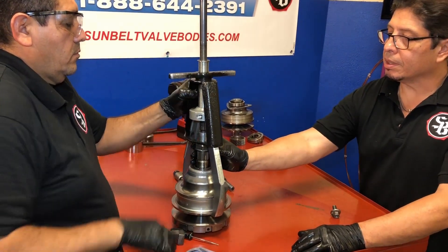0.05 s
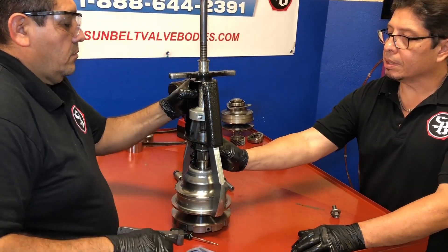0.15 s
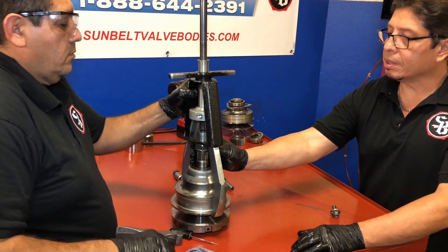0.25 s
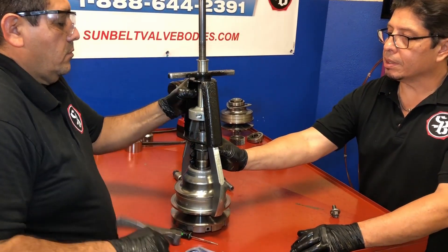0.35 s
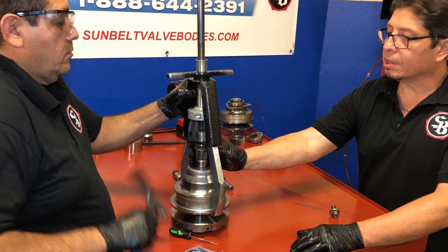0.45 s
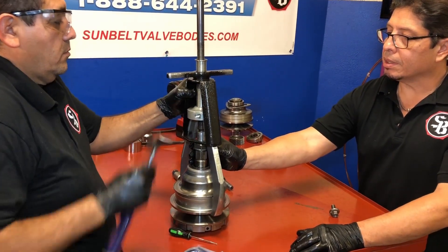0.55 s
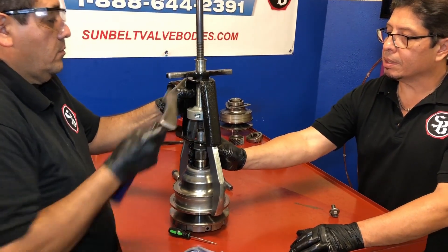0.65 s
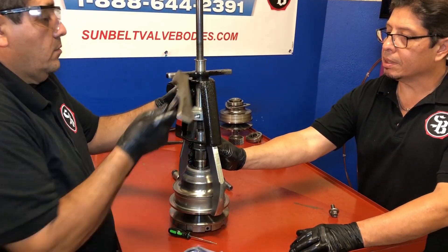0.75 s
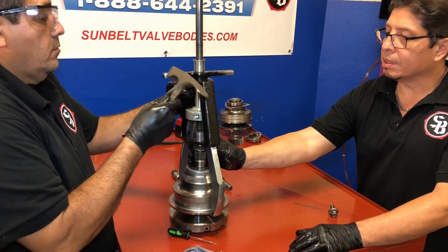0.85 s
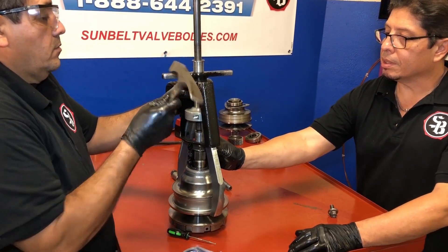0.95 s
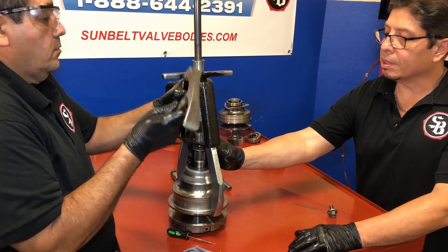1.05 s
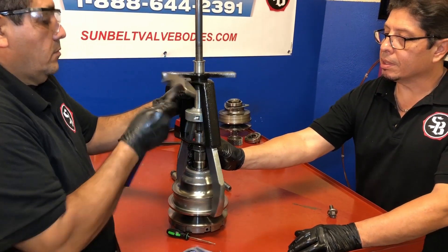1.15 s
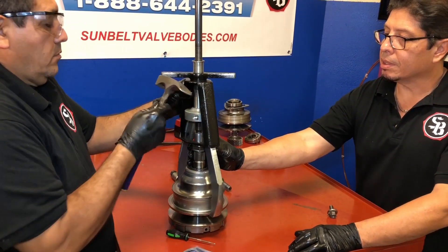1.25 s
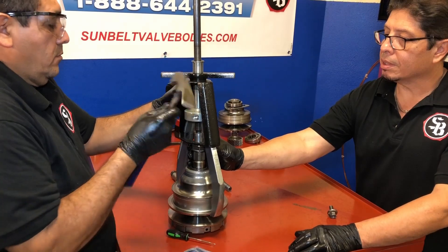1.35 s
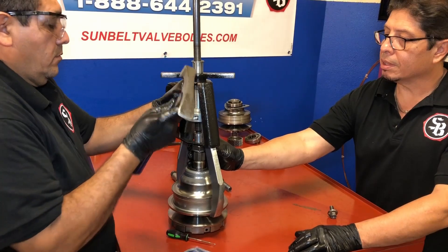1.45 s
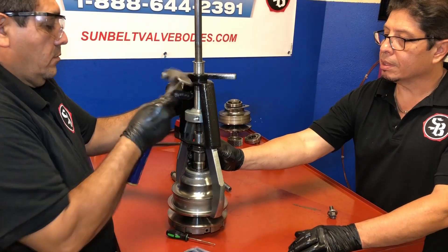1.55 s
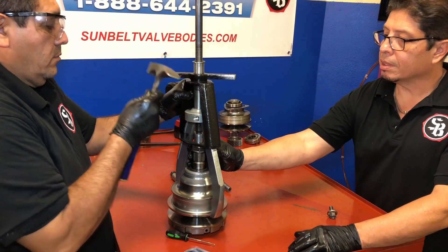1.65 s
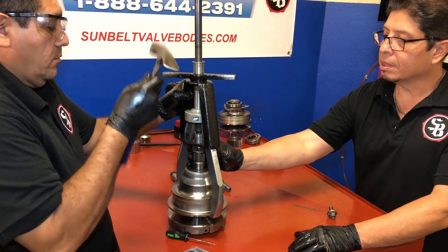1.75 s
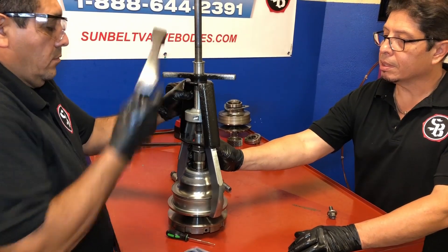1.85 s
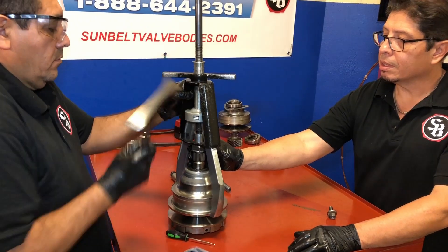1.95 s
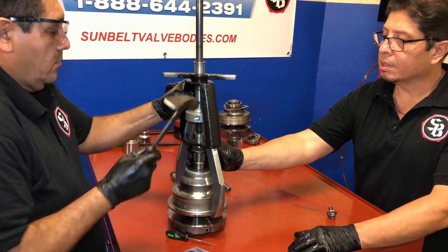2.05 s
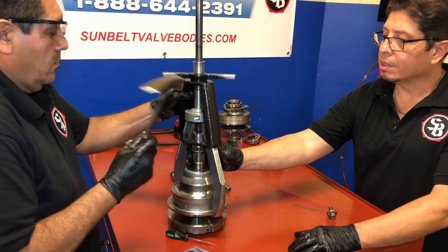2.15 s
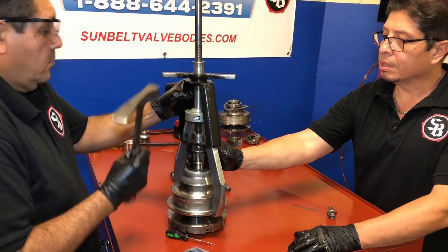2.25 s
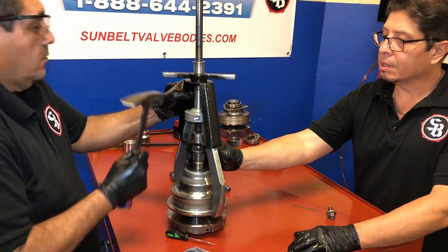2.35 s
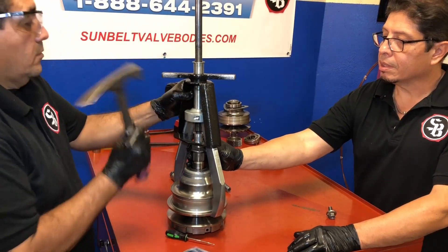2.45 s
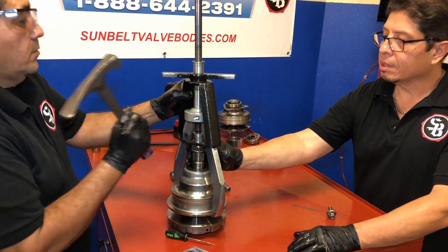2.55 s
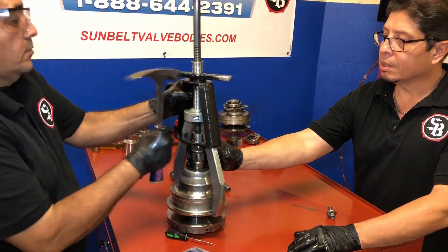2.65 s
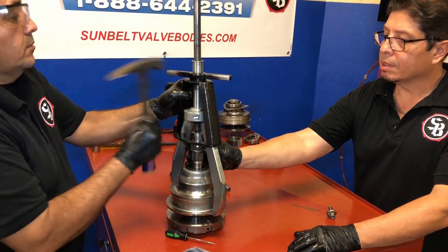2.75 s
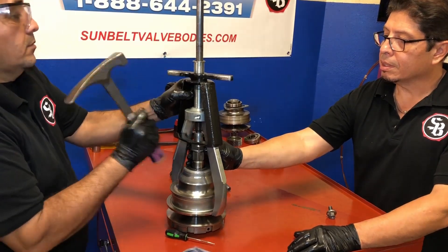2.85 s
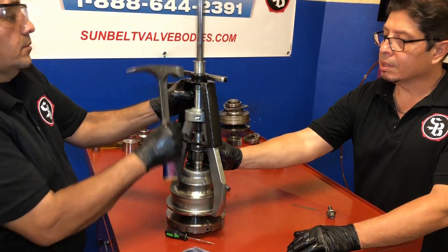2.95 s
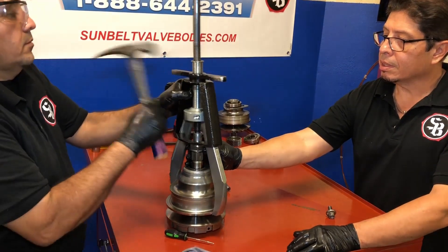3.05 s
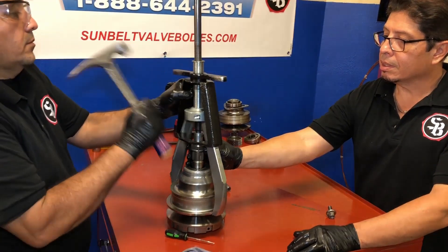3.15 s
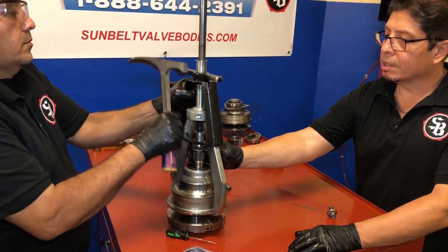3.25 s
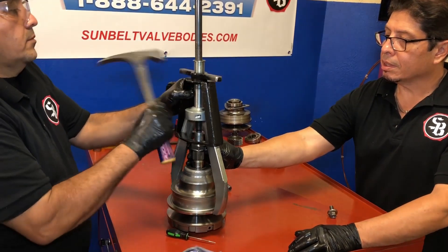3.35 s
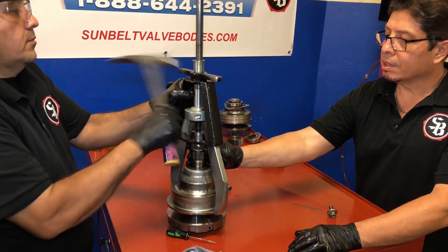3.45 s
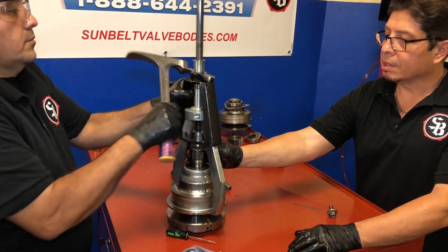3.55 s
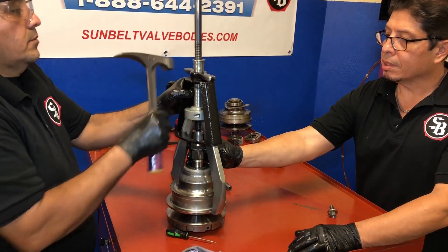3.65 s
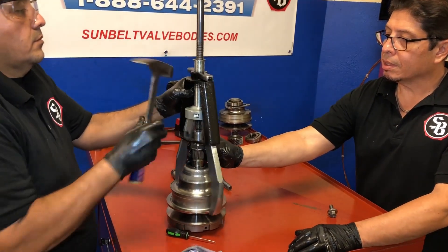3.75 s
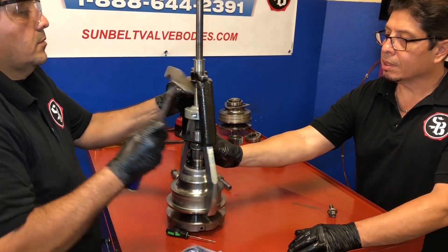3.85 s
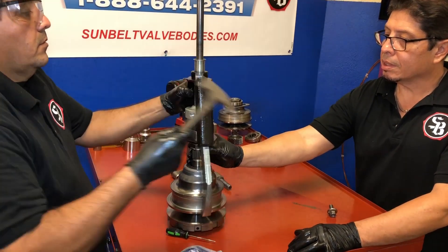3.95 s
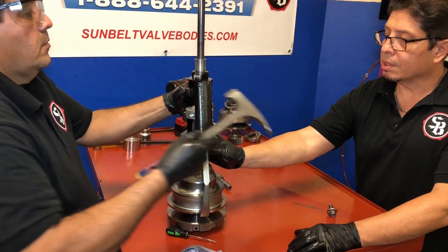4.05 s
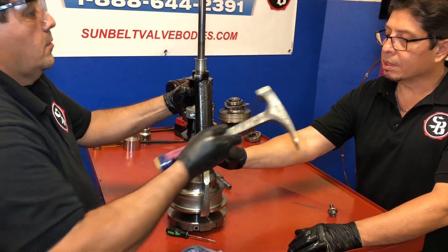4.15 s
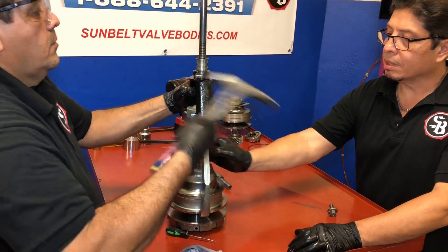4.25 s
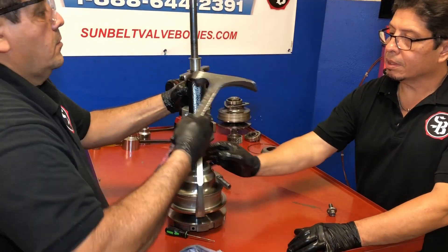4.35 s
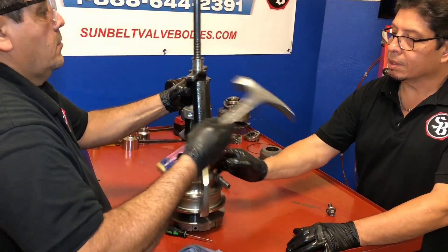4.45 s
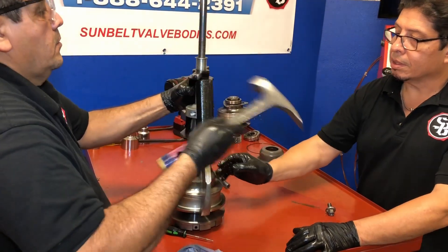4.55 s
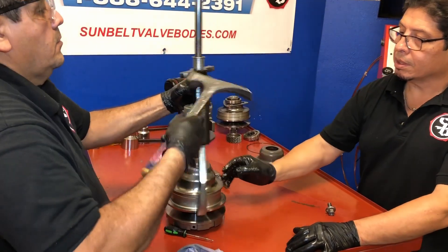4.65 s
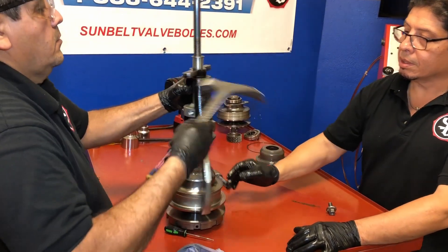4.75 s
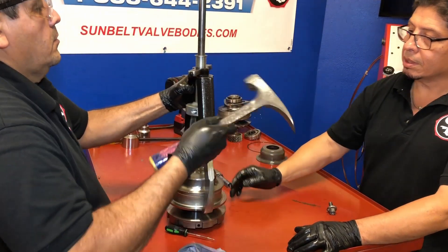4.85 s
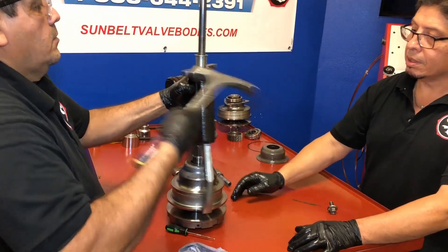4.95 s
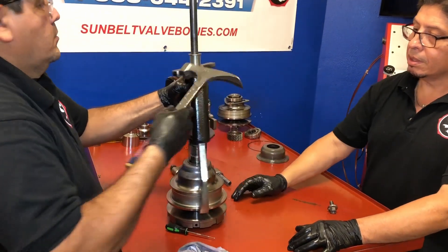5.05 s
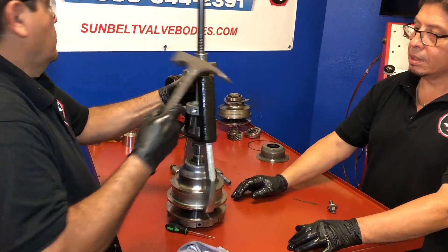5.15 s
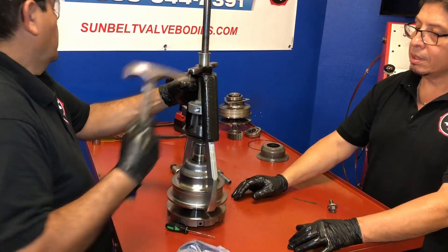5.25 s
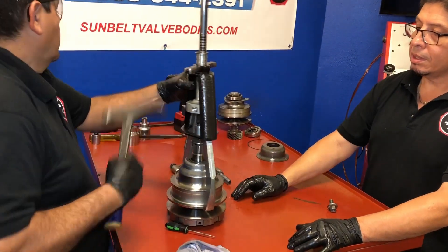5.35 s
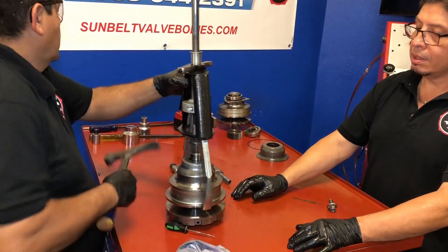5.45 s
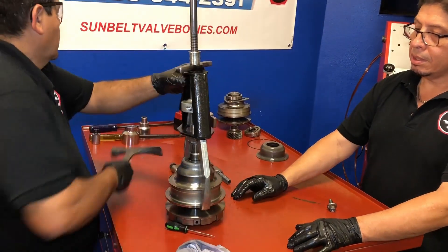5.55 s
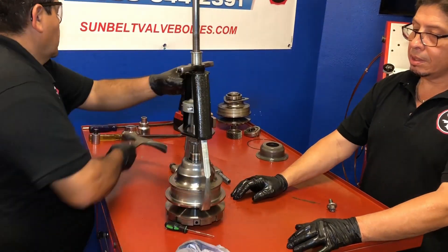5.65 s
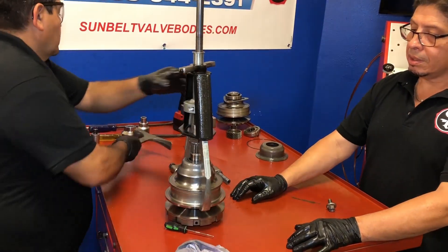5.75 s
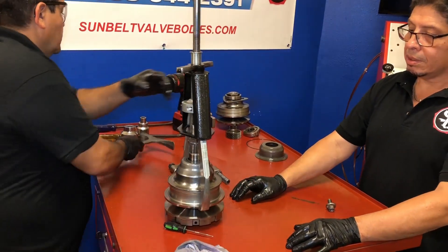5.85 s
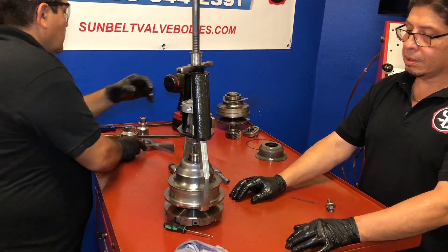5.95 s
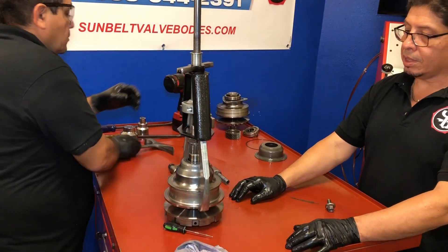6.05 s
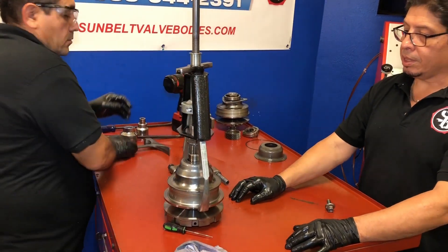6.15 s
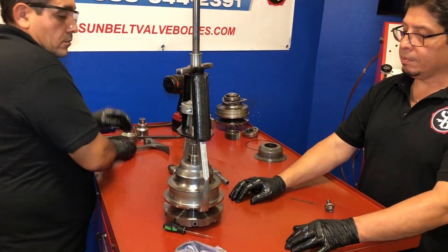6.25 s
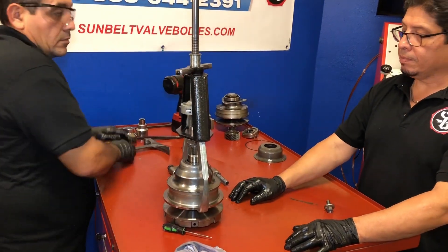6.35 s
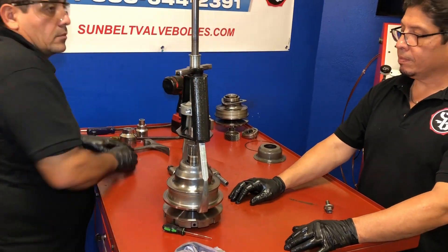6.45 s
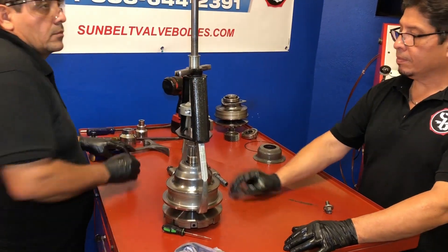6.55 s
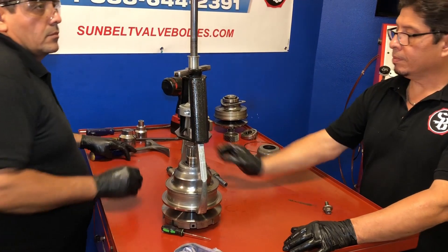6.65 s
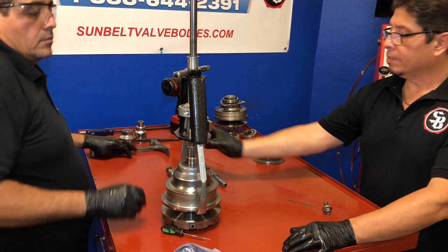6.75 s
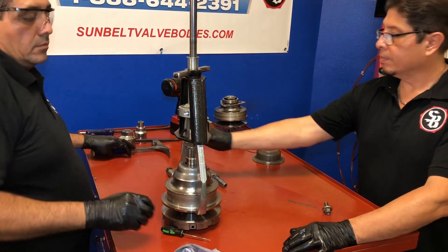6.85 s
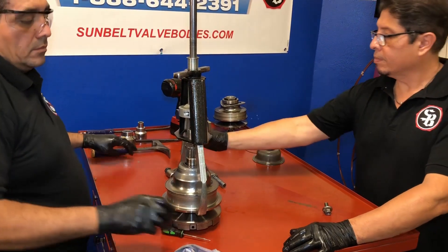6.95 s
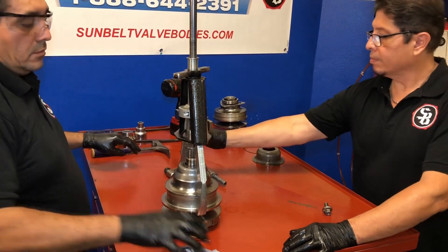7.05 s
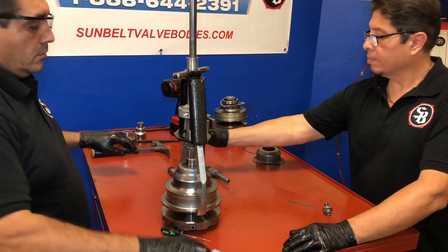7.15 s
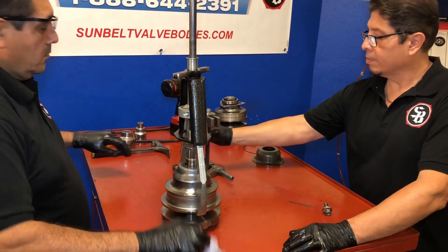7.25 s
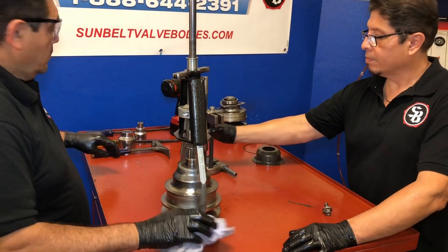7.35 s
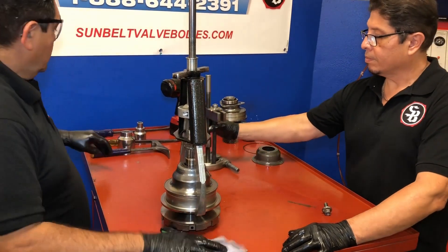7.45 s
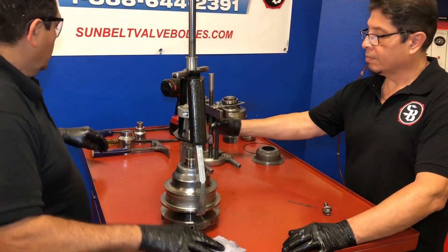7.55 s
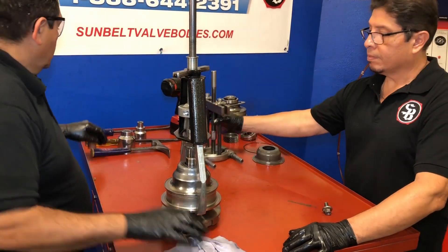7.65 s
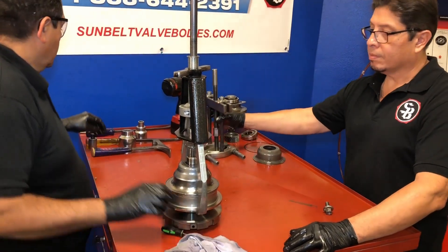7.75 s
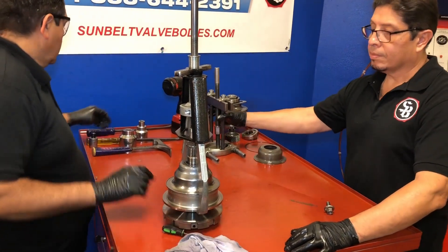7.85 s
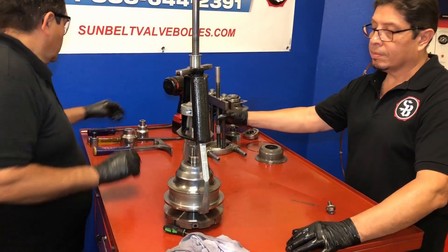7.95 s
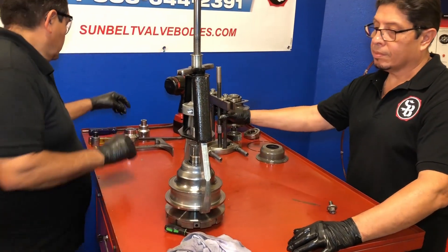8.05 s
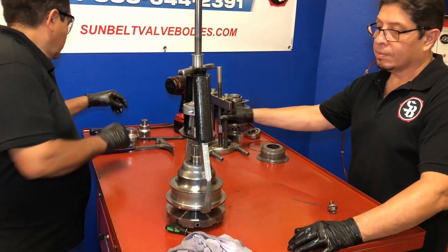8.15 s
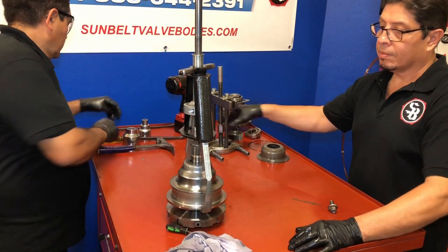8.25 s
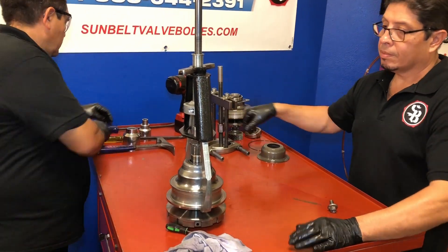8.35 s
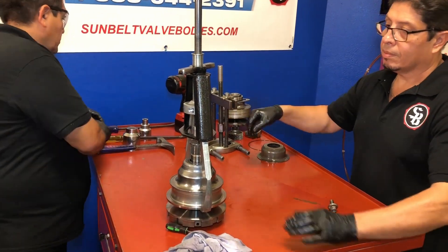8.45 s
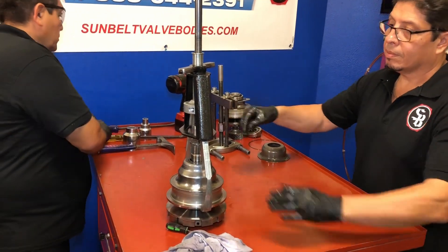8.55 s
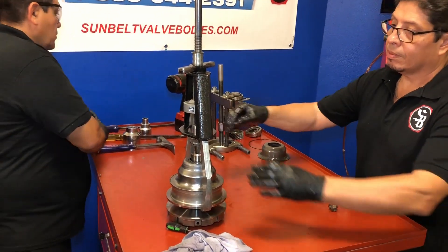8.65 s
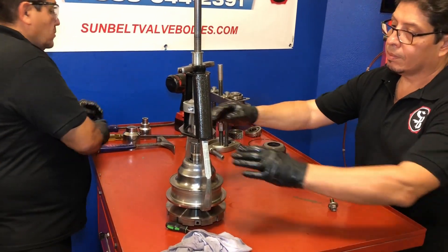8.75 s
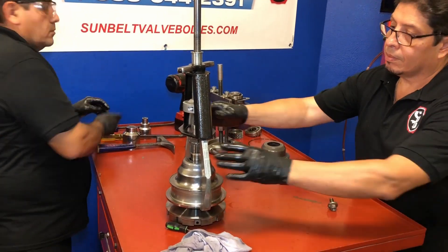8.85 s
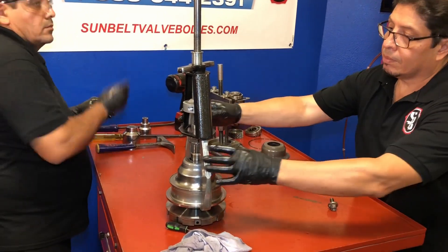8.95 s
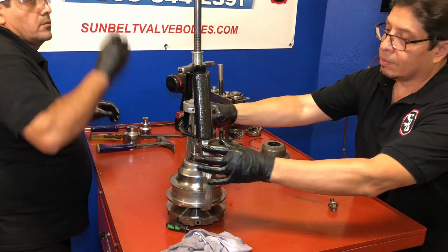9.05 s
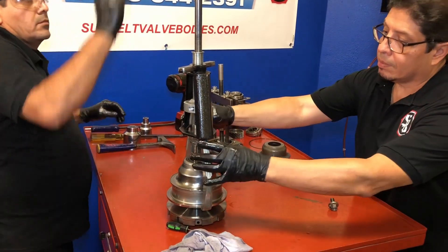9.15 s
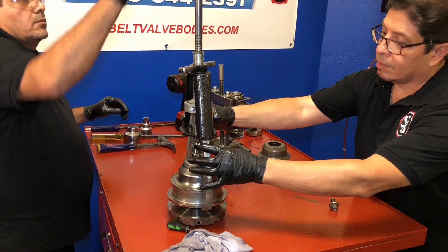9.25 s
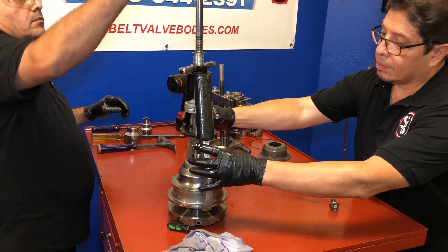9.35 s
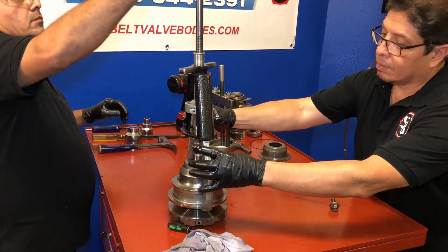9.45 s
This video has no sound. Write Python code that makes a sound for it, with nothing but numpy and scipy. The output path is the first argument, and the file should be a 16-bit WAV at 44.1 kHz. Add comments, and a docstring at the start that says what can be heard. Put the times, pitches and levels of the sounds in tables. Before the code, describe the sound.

In a small hard-walled workshop, a hammer taps the arms of a steel puller ten times at uneven spacing, each a sharp bright clank with loose rattling and a high ringing tail. Then the hammer is laid on a sheet-metal bench with a booming double knock, a heavy tool scrapes along it, and small parts click. Low mains hum and room rumble stay beneath. Close microphone, short reverberation.

```python
"""In a small hard-walled workshop a hammer taps the arms of a steel puller ten times: each blow is a burst
of noise and dying modes, and random clicks shake the same modes into a clatter while the hammer head sings on.
The hammer is then laid on a sheet-metal bench, whose modes boom, a heavy tool is dragged over it in stick-slip
clicks and small parts are set down with short rings.
Mains hum, room rumble and soft crackling swells (gloves, sleeves, noisy tails after blows) fill the gaps."""
import sys
import numpy as np
from scipy import signal
from scipy.fft import rfft, irfft
from scipy.io import wavfile
from scipy.ndimage import uniform_filter1d

SR = 44100
rng = np.random.default_rng(int(sys.argv[2]) if len(sys.argv) > 2 else 0)


def ratio_of_db(decibels):
    """Turn decibels (scalar or array-like) into linear amplitude factors; 0 dB maps to 1."""
    return 10 ** (np.asarray(decibels, float) / 20)


def int16_out(signal):
    """Quantize to a 16-bit WAV file."""
    q = np.round(np.clip(np.atleast_2d(signal).T, -1, 1) * 32767)
    wavfile.write(sys.argv[1], SR, q.astype(np.int16))


N = 419391

# noise of the steel between its modes: (frequency [Hz], relative density [dB per Hz])
STEEL_NOISE = [(290, -26), (500, -13.5), (1130, -16.5), (1370, -6.5), (1810, -7), (2070, -13), (2690, -5.5),
               (3710, -9.5), (5590, -1.5), (6380, -10), (8420, -10.5), (15300, -16), (16500, -46.5)]
# low modes of the sheet top: (frequency [Hz], relative level [dB], t60 before scaling [s])
BENCH_MODES = [(199.5, -7.5, 0.68), (252.5, 4.5, 0.36), (296, -0.5, 0.26), (382, -12, 0.45), (546, 6, 0.34),
               (746, -17.5, 0.45), (968, -13, 0.21), (1210, 0.5, 0.24), (1360, -14, 0.47),
               (1410, -10.5, 0.19), (1335, -16, 0.3), (1540, -9.5, 0.2), (1772, -26.5, 0.9),
               (2083, -31, 0.3)]


def evened(x):
    """Normalises the mean power: scales to rms 1."""
    return x / np.sqrt(np.mean(x ** 2) + 1e-20)


def read(points, hz):
    """Interpolates a table on a logarithmic frequency axis."""
    f, value = np.transpose(points)
    return np.interp(np.log(hz + 1), np.log(f + 1), value)


def add(mix, s, sound):
    """Superposes a sound on the mix from time s on."""
    part = mix[round(s * SR):][:len(sound)]
    part += sound[:len(part)]


def colour(x, points):
    """Spectral shaping: weights the spectrum of x by a table, then scales to rms 1."""
    gain = ratio_of_db(read(points, np.fft.rfftfreq(len(x), 1 / SR)))
    return evened(irfft(rfft(x) * gain, len(x)))


def fade(x, t60s):
    """Frequency-dependent damping: each band decays at its own speed."""
    hz, t, z = signal.stft(x, SR, nperseg=256)
    t60 = np.maximum(read(t60s, hz), 0.01)[:, None]
    return signal.istft(z * ratio_of_db(-60 * t / t60), SR, nperseg=256)[1][:len(x)]


def ring(modes, t):
    """Modal decay: one dying sine a row; where the blow lands sets phases and shifts levels a little."""
    hz, db, t60 = np.transpose(modes)[..., None]
    phase, luck = rng.random((len(hz), 2)).T[..., None]
    shift_db = 7 * (luck - 0.5)
    return ratio_of_db(db + shift_db - 60 * t / t60) * np.sin(2 * np.pi * (hz * t + phase))


def flutter(shape, taps):
    """Random modulation: a slow random swing of rms 1, like the beats in a cluster of close modes."""
    slow = uniform_filter1d(uniform_filter1d(rng.standard_normal(shape), taps), taps)
    return evened(slow)


def grains(per_s, spread_db, size):
    """A random impulse process: sparse clicks of random sign, a few of them large."""
    large = np.minimum(rng.exponential(1, size), 3)
    return (rng.random(size) < per_s / SR) * rng.standard_normal(size) * ratio_of_db(spread_db * large)


def puller_modes(clank, t):
    """Modal superposition: two low modes of the struck arm and the detuned upper modes, all beating."""
    # upper modes of the puller: (frequency before detuning [Hz], relative level [dB], t60 [s])
    upper = [(1380, -6, 0.25), (1479, -8, 0.22), (1593, -7, .26), (1699, -6.5, 0.16), (1798, -5, .22),
             (2028, -13, .3), (2480, -13, 0.28), (2575, -8, 0.21), (2758, -6.5, 0.23), (3290, -13, 0.097),
             (4980, -13, 0.14), (5470, -7, 0.29), (5640, -4.5, .2), (5670, -8.5, 0.13), (6110, -8, .12),
             (6700, -15, 0.33), (6950, -3.5, 0.17), (6830, -15.5, 0.067), (7500, -5.5, .12),
             (8160, -4, 0.2), (8560, 0, 0.12), (8500, -1.5, 0.091), (9260, -2, 0.081), (9220, -5.5, 0.11),
             (9940, -6, 0.11), (11100, -6.5, 0.12), (12300, -12.5, .07), (12700, -14.5, 0.07),
             (13800, -12.5, .09)]
    low_hz, low_db, second_hz, second_db = clank
    clank_t60, upper_db = 0.089, 5
    rows = [(low_hz, low_db, clank_t60), (second_hz, second_db, clank_t60)]
    detune = 1 + 0.007 * (rng.random(len(upper)) - 0.5)  # pitch shifts a little from blow to blow
    rows += [(hz * k, db + upper_db, t60) for (hz, db, t60), k in zip(upper, detune)]
    modes = ring(rows, t)
    return modes * (1 + 1.2 * np.minimum(t / 0.016, 1) * flutter(modes.shape, taps=100))


def blow(modes, t):
    """Impact excitation: the modes ring, noise cracks between them and the hard faces snap together."""
    crack = colour(rng.standard_normal(len(t)), STEEL_NOISE) * ratio_of_db(7.5 - 60 * t / 0.054)
    contact = ratio_of_db(-60 * t / 0.035) + ratio_of_db(-22.5)  # most of the first ring is lost while hammer and arm touch
    snap = np.diff(rng.standard_normal(len(t) + 1)) * ratio_of_db(3.5 - 60 * t / 0.019)
    onset = np.minimum(t / 0.00097, 1) ** 2
    return ((modes.sum(0) + crack) * contact + snap) * onset


def clatter(modes, ring_db, t60, t):
    """Convolution of random impacts with modes: loose parts shake the steel and the bench below."""
    # bench under the heavy base: (frequency [Hz], relative density [dB per Hz])
    thud_spectrum = [(70, -8), (160, 4.5), (210, -1), (400, -3.5), (900, -8), (2500, -48.5)]
    # the dense wash loses its top first: (frequency [Hz], t60 of the band fade [s])
    treble_loss = [(2000, 2.3), (8000, 0.75), (16000, .2)]
    shaking = np.minimum(t / 0.016, 1) * ratio_of_db(-60 * t / t60)
    impacts = grains(3000, 1.3, len(t)) * shaking
    shaken = signal.fftconvolve(modes, impacts[None], axes=1)[:, :len(t)]
    # every mode swings up to its own strength
    shaken *= (abs(modes).max(1) / abs(shaken).max(1))[:, None]
    # the many modes too dense to tell apart
    wash = fade(colour(grains(12000, 0.68, len(t)), STEEL_NOISE), treble_loss) * shaking
    # slow frame mode
    drone = ratio_of_db(-10.5 - 60 * t / 1.4) * np.sin(2 * np.pi * 203 * t) * np.sin(np.pi * t / t[-1])
    thud = colour(rng.standard_normal(len(t)), thud_spectrum)
    thud *= ratio_of_db(-60 * t / 0.5) * (1 - np.exp(-t / 0.019))
    return ratio_of_db(ring_db) * shaken.sum(0) + wash + ratio_of_db(-22) * (thud + drone)


def puller():
    """Impact and re-excitation: each blow rings the steel, then the clatter shakes the same modes."""
    # hammer on puller:
    # (time [s], blow gain [dB], clatter gain [dB], ring gain in the clatter [dB], clatter t60 [s])
    blows = [(0.858, -19.5, -14, -21.5, 0.16), (1.1921, -19, -10.5, -18, .21),
             (1.5967, -20, -12, -20, 0.21), (2.6831, -19.5, -10.5, -20, 0.28),
             (2.974, -23, -12, -24.5, 0.24), (3.258, -22, -11.5, -18.5, 0.12),
             (3.5098, -23, -13.5, -22, 0.19), (4.3109, -18.5, -12, -19.5, 0.11),
             (4.6588, -18.5, -9.5, -22, 0.15), (4.9933, -22, -8, -22, 0.14)]
    # low modes of the struck arm, which shift with grip and spot, one row a blow:
    # (low frequency [Hz], relative level [dB], second frequency [Hz], relative level [dB])
    clanks = [(1380, 12, 1787, 12.5), (1350, 1.5, 1833, 11.5), (1423, 14, 2000, 8.5), (1410, 14, 1696, 6),
              (1338, 8.5, 1906, 16.5), (1320, 8, 1500, 1.4), (1286, 10.5, 3500, -11.5),
              (1483, -3, 2031, 1.9), (1480, -3.5, 2300, 2.5), (1620, 1.5, 1100, 0.5)]
    out, t = np.zeros(N), np.arange(SR // 2) / SR
    for (s, db, clatter_db, ring_db, t60), clank in zip(blows, clanks):
        modes = puller_modes(clank, t)
        add(out, s, ratio_of_db(db) * blow(modes, t))
        add(out, s + 0.008, ratio_of_db(clatter_db) * clatter(modes, ring_db, t60, t))
    return out


def hammer_head():
    """Free vibration: the head sings on one mode until it touches again or a hand damps it."""
    # (time [s], level before rise and decay [dB], stopped after [s])
    songs = [(2.977, -27, 0.32), (3.259, -33, 0.57), (3.518, -26, .68), (4.33, -37.5, 0.47),
             (4.67, -48, 0.41), (5.0, -30.5, 0.17)]
    free_t60, stopped_t60, rise_s = 0.85, 0.3, 0.025
    out, t = np.zeros(N), np.arange(SR) / SR
    tone = (1 - np.exp(-t / rise_s)) * np.sin(2 * np.pi * 4484 * t)
    for s, db, held in songs:
        stopping_db = -60 * np.maximum(t - held, 0) / stopped_t60
        add(out, s, ratio_of_db(db - 60 * t / free_t60 + stopping_db) * tone)
    return out


def bench():
    """Plate vibration: a knock booms in low modes, with a dense wash above and a short bright tick."""
    # things set down on the bench:
    # (time [s], boom gain [dB], tick gain [dB], rise time constant [s], damping [divides t60])
    knocks = [(5.974, -4, -7.5, 0.019, 1.1), (6.028, -9.5, -4.5, .0024, 1.1), (6.213, -18, -47, 0.012, 1.2),
              (6.32, -22.5, -39, 0.0011, 1.39), (6.368, -28.5, -48, 0.0035, 1.8),
              (7.015, -36.5, -35, 0.0038, 1.8), (8.088, -44, -79, 0.011, 0.75),
              (8.411, -26.5, -18, 0.0011, 0.78)]
    # dense upper modes of the sheet: (frequency [Hz], relative density [dB per Hz])
    sheet_spectrum = [(47, -57.5), (80, -4.5), (265, -1.5), (361, 0.5), (538, 2.5), (588, -1.5),
                      (1090, 1.5), (2780, -7), (5900, -19.5), (16000, -47)]
    # their decay: (frequency [Hz], t60 before damping [s])
    sheet_t60 = [(100, 0.23), (500, 0.45), (2000, 0.13), (8000, 0.27)]
    out, t, hz = np.zeros(N), np.arange(SR // 2) / SR, 6330
    tick_spectrum = [(300, -30), (hz * 0.58, -12), (hz, 0), (hz, -8), (16000, -34)]
    for s, db, tick_db, rise, damping in knocks:
        damped = [(f, t60 / damping) for f, t60 in sheet_t60]
        wash = fade(colour(rng.standard_normal(len(t)), sheet_spectrum), damped)
        modes = [(f, g, 1.4 * t60 / damping) for f, g, t60 in BENCH_MODES]
        boom = ratio_of_db(-14.5) * ring(modes, t).sum(0)
        rising = 1 - np.exp(-t / max(rise, 1e-4))  # bass takes a moment to swing up
        tick = colour(rng.standard_normal(len(t)), tick_spectrum)
        tick *= ratio_of_db(tick_db - 60 * t / 0.041) * (1 - np.exp(-t / 0.00054))
        add(out, s, ratio_of_db(db) * (wash + boom) * rising + tick)
    return out


def drags():
    """Stick-slip friction: clicks shake the sheet through its modes, and finer grit hisses on top."""
    # effort of the long drag: (time [s], level [dB])
    pull_points = [(7.08, -42), (7.458, -23.5), (7.632, -25), (7.876, -35), (7.92, -35)]
    # short shoves of tools over the bench, and a knock near 7.93 s:
    # (start [s], rise [s], t60 [s], level [dB], grit relative to it [dB])
    bursts = [(.18, 0.035, 0.67, -50, -15), (.32, 0.014, .22, -47, -33), (6.699, .004, 0.69, -31.5, -21.5),
              (6.791, 0.017, 0.188, -59, 1), (7.015, .025, 0.17, -32, -13), (8.086, .004, 0.63, -39.5, -16),
              (8.2, 0.052, 0.42, -60, 9.5), (7.914, 0.023, 0.258, -32, -13.5),
              (8.47, .015, 0.35, -41, -21.5), (8.618, .035, 0.26, -30.5, -27)]
    # the dragged tool presses on the sheet and sings along:
    # (frequency [Hz], bandwidth [Hz], relative level [dB])
    tool_modes = [(359.7, 55, -1), (677, 90, -1.5), (1014, 59, -3)]
    # spectra of rumble, scrape and grit: (frequency [Hz], relative density [dB per Hz])
    rumble_spectrum = [(53, -52), (90, -12), (311, -1), (368, 0.5), (455, -2.5), (497, 0.5), (665, -4),
                       (804, -2.5), (972, -13.5), (1300, -19.5), (1690, -46), (2860, -120)]
    scrape_spectrum = [(500, -14), (1100, 0), (1700, -5.5), (3200, -19.5), (6000, -40.5)]
    grit_spectrum = [(1470, -21.5), (2500, 2), (3630, -2.5), (5440, 1.5), (6250, -1), (6860, -5.5),
                     (13900, -29), (16000, -41)]

    at, db = np.transpose(pull_points)
    t = np.arange(N) / SR
    ends = np.clip(np.minimum(t - at[0], at[-1] - t) / 0.04, 0, 1)
    pull = ratio_of_db(np.interp(t, at, db)) * ends
    brief, gritty = np.zeros(N), ratio_of_db(-18) * pull
    t = np.arange(SR // 2) / SR
    for s, rise, t60, db, grit_db in bursts:
        burst = ratio_of_db(db - 60 * np.maximum(t - rise, 0) / t60) * np.minimum(t / rise, 1) ** 2
        add(brief, s, burst)
        add(gritty, s, ratio_of_db(grit_db) * burst)

    slips = grains(2000, 1.0, N)
    # the low bench modes at equal strength, with one common t60
    response = sum(ratio_of_db(-60 * t / 0.067) * np.sin(2 * np.pi * f * t) for f, _, _ in BENCH_MODES)
    sheet = signal.oaconvolve(slips, response)[:N]
    rumble = colour(evened(slips) + 0.2 * evened(sheet), rumble_spectrum)
    # a mode decays faster the wider its resonance
    singing = sum(ratio_of_db(g - 27 * width * t) * np.sqrt(width) * np.sin(2 * np.pi * f * t)
                  for f, width, g in tool_modes)
    tool = ratio_of_db(-2.5) * evened(signal.oaconvolve(slips, singing)[:N])
    # below 394 Hz the weight of the tool damps the sheet
    weight = signal.butter(2, 394, "highpass", fs=SR, output="sos")
    pressed = signal.sosfilt(weight, rumble + tool)
    scrape = (ratio_of_db(-6) * pull + ratio_of_db(-12) * brief) * colour(slips, scrape_spectrum)
    grit = gritty * colour(grains(4000, 0.83, N), grit_spectrum)
    jerks = ratio_of_db(0.6 * flutter(N, taps=900))  # the hand jerks a little
    return jerks * (pull * pressed + brief * rumble + scrape + grit)


def ticks():
    """Small-body resonance: a tiny click and one short beating ring, with an overtone if not too high."""
    # light taps and small steel parts: (time [s], click gain [dB], ring gain [dB], ring frequency [Hz])
    taps = [(.101, -58, -65, 2400), (1.976, -46.5, -27.5, 1572), (2.024, -47, -58, 7370),
            (2.112, -51, -45, 970), (2.654, -39.5, -29, 1450), (3.766, -49.5, -38.5, 1735),
            (4.377, -17, -10.5, 1780), (4.38, -27.5, -21, 2642), (4.614, -27.5, -18.5, 1850),
            (5.267, -38.5, -32, 1760), (5.498, -51.5, -66.5, 7600), (7.017, -48.5, -34.5, 6020),
            (7.054, -59, -43, 4170), (7.054, -59, -48, 7100), (7.789, -45, -40, 5850),
            (7.845, -41.5, -48, 6960), (7.846, -52, -48, 11240), (7.945, -50.5, -39, 5600),
            (7.949, -43.5, -46, 7200), (7.954, -63, -46, 4120), (7.985, -50.5, -56, 5950),
            (8.125, -50, -56, 5470), (8.413, -38.5, -34, 10360), (8.414, -25.5, -29, 2698),
            (4.616, -38, -36, 4840)]
    # decay of the rings: (ring frequency [Hz], t60 [s])
    ring_t60 = [(1500, 0.034), (4000, 0.11), (10000, 0.074)]
    overtone, overtone_db = 2.7, -21.5  # frequency ratio and relative level
    out, t = np.zeros(N), np.arange(SR // 4) / SR
    for s, click_db, ring_db, hz in taps:
        click_spectrum = [(300, -21), (hz, 0), (2.6 * hz, -8), (22000, -26)]
        click = colour(rng.standard_normal(len(t)), click_spectrum) * ratio_of_db(click_db - 60 * t / 0.018)
        tone = np.sin(2 * np.pi * hz * t)
        if hz * overtone < SR / 3:
            tone += ratio_of_db(overtone_db) * np.sin(2 * np.pi * hz * overtone * t)
        envelope = ratio_of_db(ring_db - 60 * t / read(ring_t60, hz)) * (1 - np.exp(-t / 0.001))
        beats = 1 + 0.5 * np.minimum(t / 0.0026, 1) * flutter(len(t), taps=90)
        add(out, s, click + envelope * tone * beats)
    return out


def crackling_swells():
    """Amplitude modulation of random impulses: a fine crackle rises and falls in soft swells."""
    # gloves and sleeves, and late noisy tails after blows:
    # (centre [s], peak level [dB], half length [s])
    swells = [(0.106, -51, 0.0092), (0.253, -65.5, 0.047), (0.348, -68, 0.011), (.62, -74.5, 0.046),
              (1.884, -53, 0.07), (2.031, -54, 0.0076), (2.221, -64, 0.11), (2.364, -53.5, 0.027),
              (2.641, -69, .015), (3.85, -61.5, 0.073), (4.22, -74, 0.029), (5.324, -58, .06),
              (5.491, -62, 0.059), (5.7, -63.5, .09), (5.91, -58, 0.11), (6.455, -58, 0.034),
              (6.631, -63.5, 0.097), (9.03, -62.5, 0.028), (9.208, -66, .11)]
    # spectrum of the crackle: (frequency [Hz], relative density [dB per Hz])
    crackle_spectrum = [(300, -8), (1000, 7.5), (4000, 4.5), (10000, -1), (16000, -7)]
    t = np.arange(N) / SR
    level = sum(ratio_of_db(db) * np.exp(-((t - s) / half) ** 2) for s, db, half in swells)
    return level * colour(grains(6000, 2.2, N), crackle_spectrum)


def room(x):
    """Diffuse reverberation: sparse random-sign taps after a 10 ms gap, each band with its own decay."""
    # (frequency [Hz], t60 [s])
    room_t60 = [(200, 1), (700, 0.53), (2000, 0.51), (5000, 0.58), (12000, 0.42)]
    taps = np.zeros(SR)
    at = np.arange(440, SR - 20, 20)
    taps[at + rng.integers(0, 20, len(at))] = rng.choice([-1., 1.], len(at))
    tail = fade(taps, room_t60)
    return signal.oaconvolve(x, tail / np.linalg.norm(tail))[:N]


def background():
    """Stationary noise and a pure tone: steady room air and a mains hum that wavers in level."""
    # room air: (frequency [Hz], relative density [dB per Hz])
    air = [(12, -43.5), (20, -10), (65, -7.5), (96, -10.5), (123, -3.5), (172, -10.5), (216, -17),
           (337, -17), (410, -22.5), (1060, -32), (2910, -41), (3740, -41), (10800, -46.5), (16000, -53.5)]
    hum = ratio_of_db(-48.5 + 0.57 * flutter(N, taps=2500)) * np.sin(2 * np.pi * 119.7 * np.arange(N) / SR)
    return ratio_of_db(-50.5) * colour(rng.standard_normal(N), air) + hum


def scene():
    """Superposition of direct, reverberant and background sound; the upright puller excites the room most."""
    steel = puller() + hammer_head()
    table = bench() + drags() + ticks() + crackling_swells()
    reverberant = room(ratio_of_db(-11) * steel + ratio_of_db(-13) * table)
    return (steel + table + reverberant + background())[None]


def band_limit(x):
    """A steep low-pass at the top of the band."""
    return signal.sosfilt(signal.butter(12, 17090, fs=SR, output="sos"), x)


def record(dry):
    """High-pass filtering and soft saturation: the microphone drops deep bass, loud peaks round off."""
    thin = signal.sosfilt(signal.butter(2, 70, "highpass", fs=SR, output="sos"), dry)
    mix = 0.9 * np.tanh(thin / 0.93)
    return band_limit(mix)


dry = scene()
out = record(dry)
int16_out(out)
```